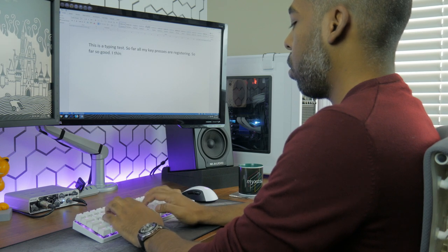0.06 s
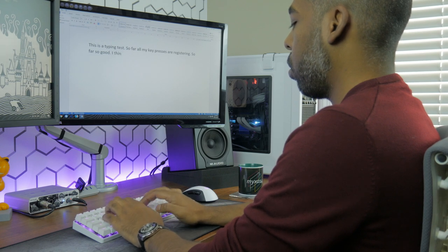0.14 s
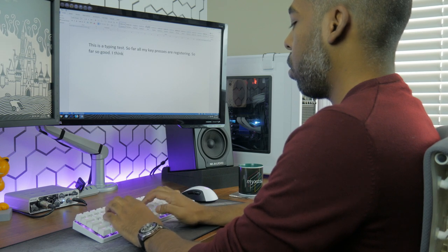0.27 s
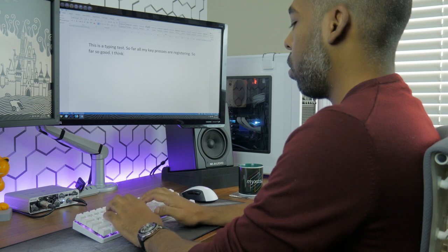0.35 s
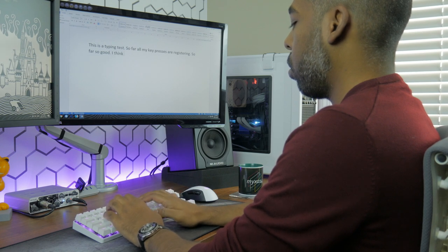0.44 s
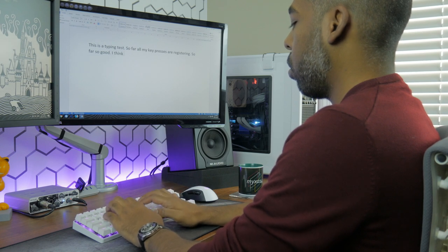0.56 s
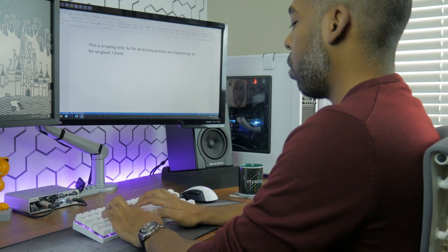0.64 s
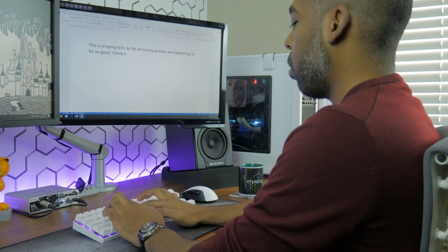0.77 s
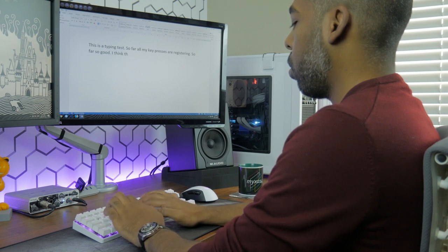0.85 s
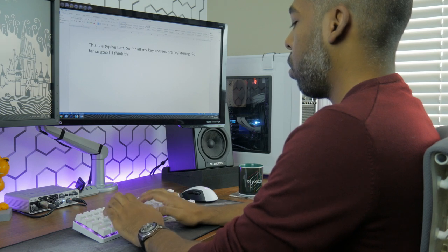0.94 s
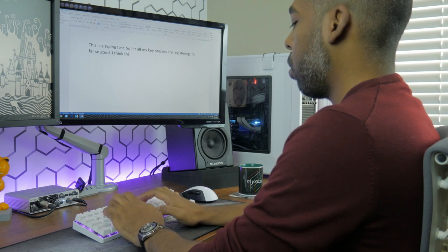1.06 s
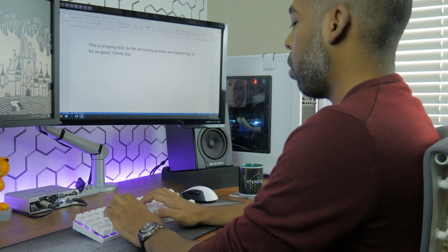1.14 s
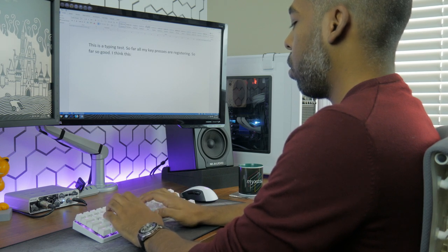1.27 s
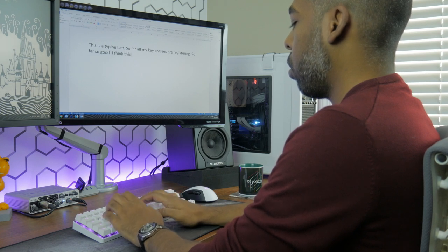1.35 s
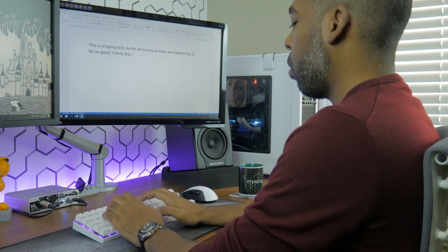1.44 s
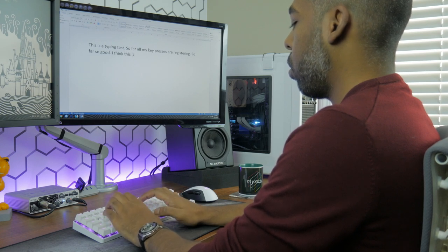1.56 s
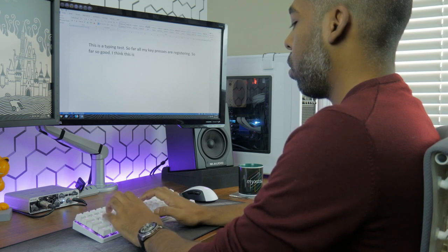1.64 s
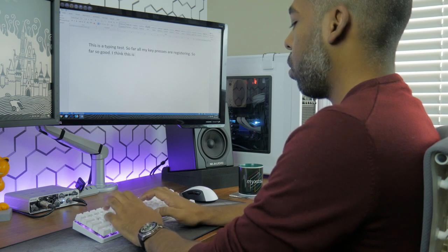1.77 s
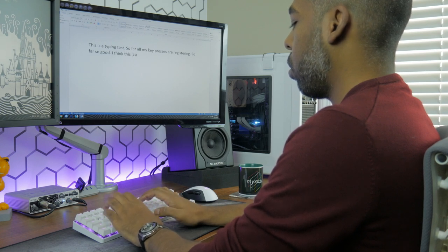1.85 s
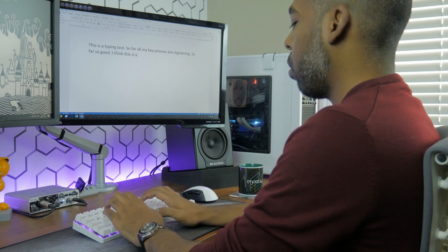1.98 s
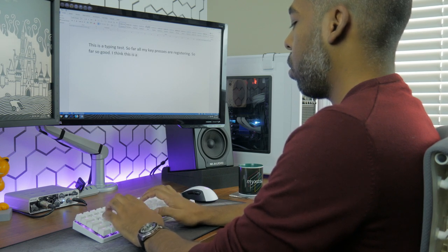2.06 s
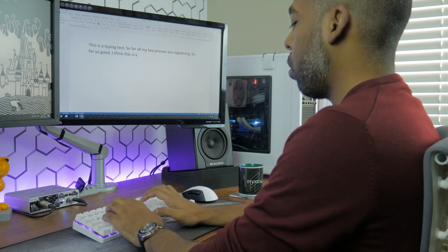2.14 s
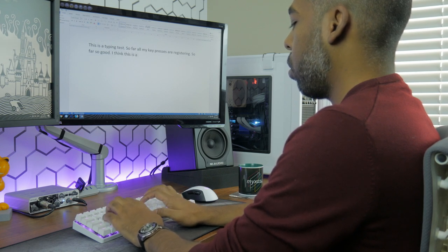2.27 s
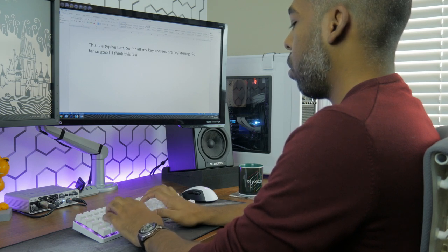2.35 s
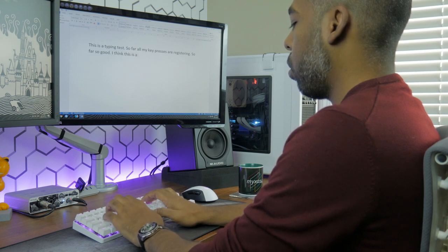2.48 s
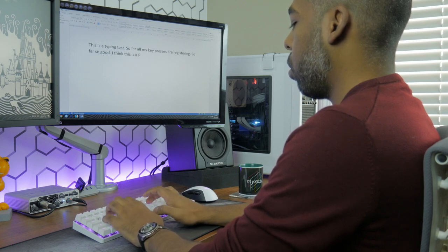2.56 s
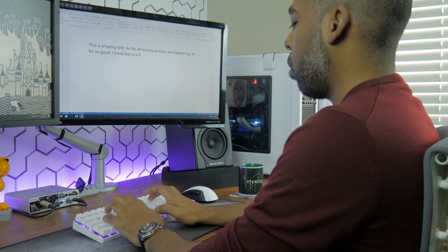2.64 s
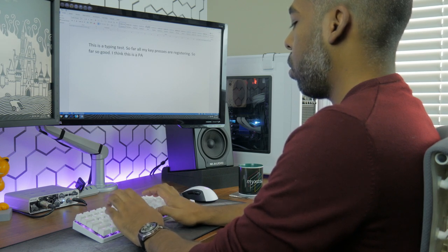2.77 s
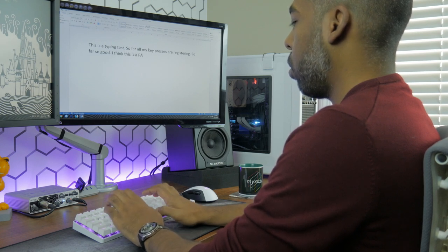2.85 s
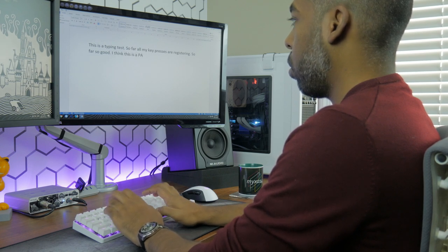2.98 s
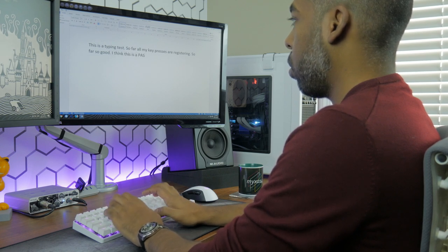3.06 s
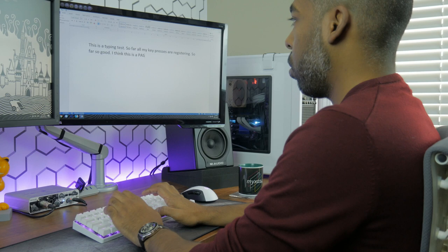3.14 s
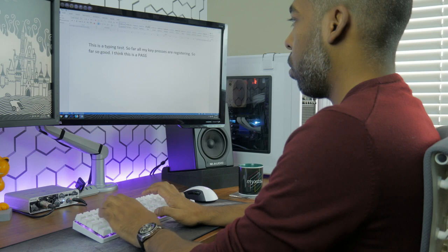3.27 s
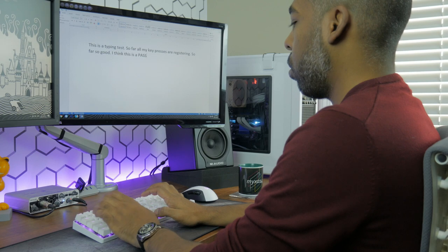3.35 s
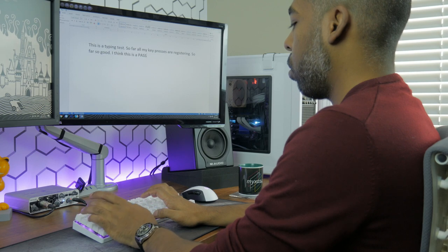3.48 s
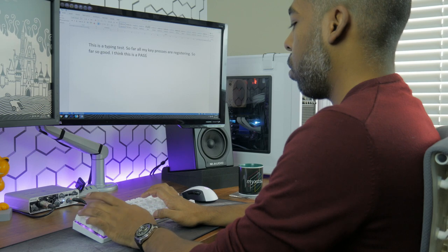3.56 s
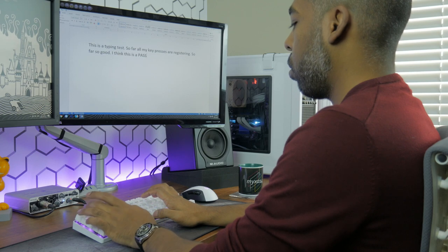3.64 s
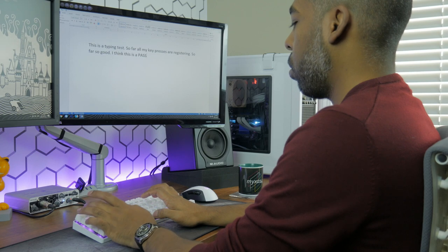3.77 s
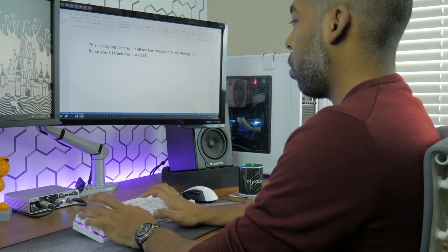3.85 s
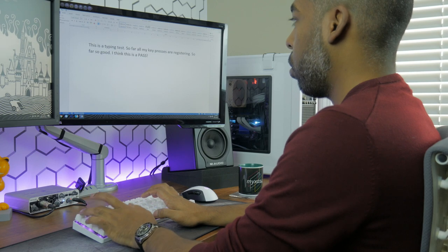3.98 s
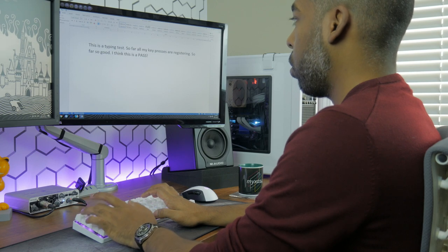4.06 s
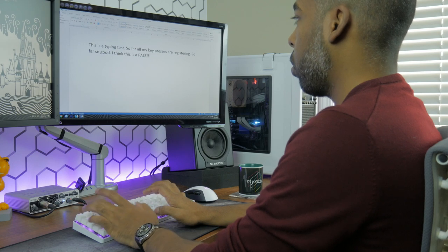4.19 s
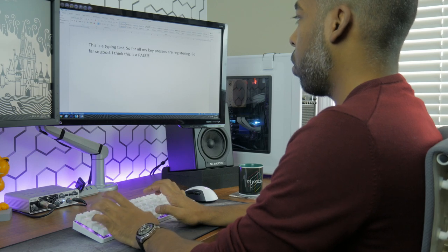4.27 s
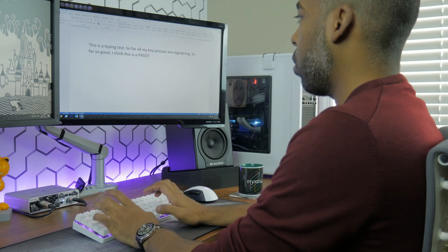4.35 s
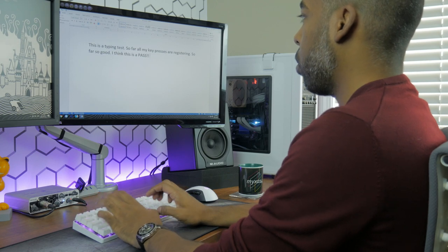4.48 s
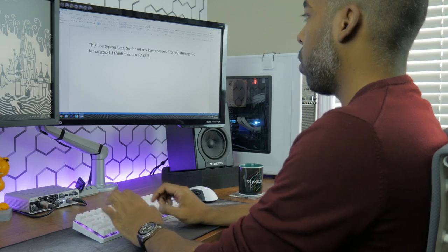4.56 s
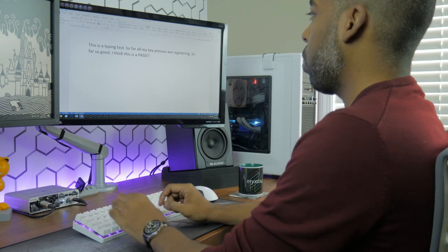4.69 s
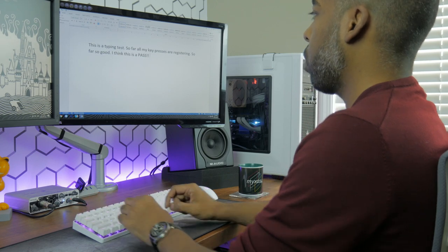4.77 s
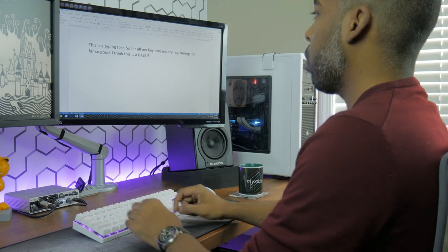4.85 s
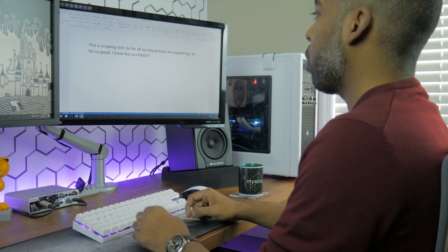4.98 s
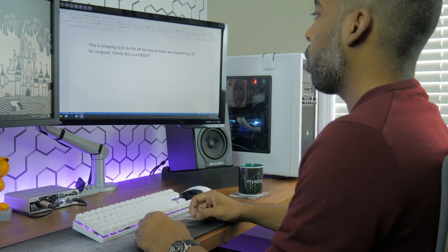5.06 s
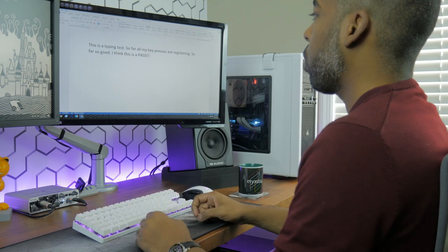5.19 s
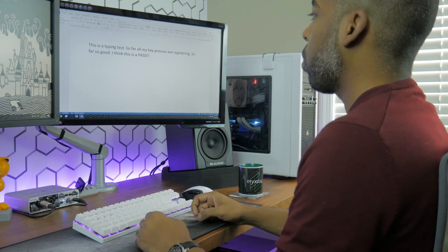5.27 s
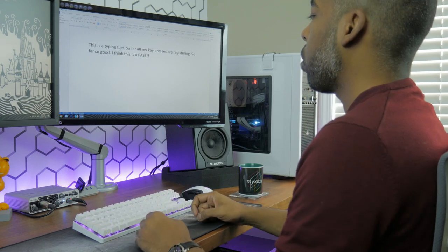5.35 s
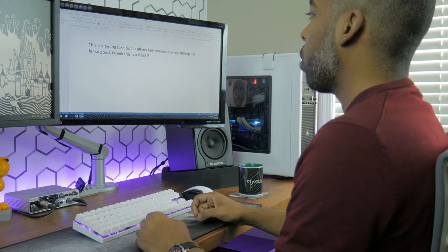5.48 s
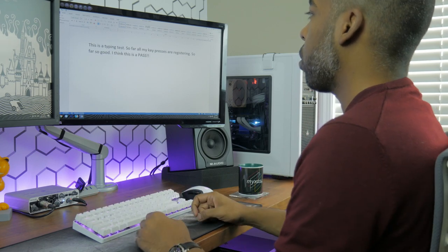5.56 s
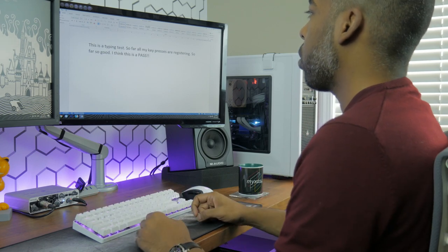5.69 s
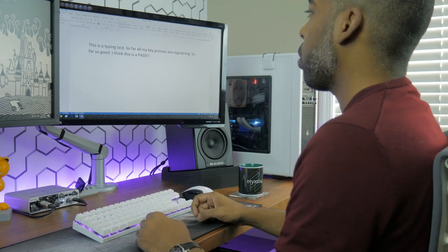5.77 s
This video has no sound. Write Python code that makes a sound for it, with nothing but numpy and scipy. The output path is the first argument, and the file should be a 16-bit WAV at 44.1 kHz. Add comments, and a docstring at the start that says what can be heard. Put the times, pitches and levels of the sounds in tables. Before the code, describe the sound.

Fast, sharp typing on a clicky mechanical keyboard in short bursts, close up in a quiet room, ending with a hand knocking the desk.

```python
"""A key knock opens quick bursts of typing on a mechanical keyboard in a small quiet room, nearly mono and close.
Fingertips land, then stems scrape, knock and rattle: noisy blows excite the rings of cap and case.
Near the end a hand drops on the desk, as a ringing click, and sleeves brush back in hissing noise.
Below lie a wavering sine hum that drifts up overall and a steady noise room tone; sparse taps make the room's answer."""
import sys
import numpy as np
from scipy import signal
from scipy.fft import rfft, irfft
from scipy.io import wavfile
from scipy.ndimage import uniform_filter1d

SR = 44100
rng = np.random.default_rng(int(sys.argv[2]) if len(sys.argv) > 2 else 0)


def waveform_to_disk(signal):
    """Save audio, clipped to [-1, 1], as 16-bit WAV at the path in sys.argv[1]."""
    frames = np.transpose(np.atleast_2d(signal))
    scaled = np.clip(frames, -1, 1) * 32767
    samples = np.round(scaled).astype(np.int16)
    wavfile.write(sys.argv[1], SR, samples)


N = 256662

# room tone spectrum: (f/Hz, relative level/dB)
ROOM_TONE = [(12, -49), (20, -14.5), (80, -18), (112, -8), (161, -10), (202, -6.5), (343, -10), (372, -9.5),
             (565, -13.5), (908, -20.5), (1100, -19), (3180, -32.5), (15600, -44.5)]
ROOM_TONE_DB = -58.5  # rms
# left-right likeness of the room tone: (f/Hz, correlation/0-1)
TONE_LIKENESS = [(60, 0.97), (240, 0.99), (950, 0.99), (3770, 0.72), (15000, 0.3)]
# hum glide, before its level wavers: (t/s, f/Hz, rms level/dB)
HUM_GLIDE = [(0, 105.9, -83), (1.9, 101.4, -80), (2.4, 107, -68.5), (3.001, 112, -59), (3.5, 116, -65),
             (4.0, 121, -77), (4.601, 122.4, -69.5), (5.82, 130, -82.5)]
# cloth sliding: (start t/s, end t/s, level/dB)
SLEEVE_BRUSHES = [(4.56, 4.83, -59.5), (4.959, 5.23, -60.5)]
# cloth hiss spectrum: (f/Hz, relative level/dB)
CLOTH_SPECTRUM = [(1470, -32.5), (2500, -11.5), (3910, -9), (4050, -7), (4390, -5), (4750, -10),
                  (7920, -6.5), (10000, -21), (14000, -29)]
# decay of the room: (f/Hz, t60/s)
ROOM_DECAY = [(300, 0.17), (800, 0.28), (2000, 0.26), (5500, 0.25), (12000, 0.18)]
# side under mid in the room's answer: (f/Hz, level/dB)
ROOM_WIDTH = [(500, -22.5), (1200, -31), (2500, -27.5), (5000, -20), (12000, -16)]
# knuckles on the desk: (t/s, level/dB)
KNUCKLES = [(4.525, 1), (4.531, -6.5), (4.538, -7), (4.542, -8)]
# desk spectrum: (f/Hz, relative level/dB)
DESK_SPECTRUM = [(47, -71.5), (80, -56), (279, -10), (482, -2.5), (1130, 7), (1610, -5.5), (1790, -3.5),
                 (2140, 1), (6110, -16), (15000, -88)]
# desk resonances: (f/Hz, width/Hz, lift/dB)
DESK_RINGS = [(450, 88, 6.5), (524, 53, 9), (709, 36, 7.5), (1128, 71, -1), (1460, 130, 6.5),
              (1787, 160, 8.5)]
# plastic case and plate: (f/Hz, relative level/dB)
CASE_SPECTRUM = [(120, -45.5), (200, -43), (516, -25), (653, -7), (770, -2), (1030, -4.5), (1330, 0),
                 (1780, -1), (2340, -1), (3430, -2.5), (5030, -15), (9680, -21), (10500, -27.5),
                 (14000, -32), (15600, -38.5)]
# narrow case resonances, before they are limited: (f/Hz, width/Hz, lift/dB)
CASE_RINGS = [(705, 60, -1.5), (1390, 93, 4.5), (1493, 18, 10.5), (2320, 140, 4), (2540, 72, 2.5),
              (3100, 26, 6), (3290, 41, 4), (5980, 150, 1), (8530, 2700, 5)]
# fingertips landing on a cap just before its knock: (t/s, level/dB)
FINGERTIPS = [(0.256, -4), (0.678, -12.5), (0.767, -22), (0.867, -18), (0.968, -14), (1.106, -17.5),
              (1.181, -6.5), (1.354, -20), (1.57, -2.5), (1.677, -12.5), (2.301, -34), (2.343, -23),
              (2.596, -24), (2.934, -16.5), (2.994, -10.5), (3.05, -18), (3.21, -14.5), (3.472, -43),
              (3.868, -14), (4.208, -12.5), (4.308, -22)]
# a loose key whose wire rattles and rings high: (t/s, level/dB, case thud level/dB)
LOOSE_KNOCKS = [(2.358, -12.5, 3.5), (3.221, -6, 7), (3.493, -7, -17), (4.21, -4.5, 5)]
# resonances of that wire: (f/Hz, width/Hz, lift/dB)
WIRE_RINGS = [(5810, 730, 10.3), (4310, 250, 4)]
# wide keys knocking, down or up: (t/s, level/dB, cap ring f/Hz, case thud level/dB)
WIDE_KNOCKS = [(0.266, 5, 2370, 9.5), (0.362, -5.5, 1940, 7.5), (1.189, 5, 2210, 8), (1.259, -7, 2070, 4.5),
               (1.58, 4.5, 2220, 5.5), (1.685, -4.5, 1950, 11.5), (1.875, 1.3, 2290, 8),
               (1.972, -2, 2000, 10), (4.32, 3, 2250, 7), (4.441, -1, 1900, 14)]
# letter keys knocking, down or up: (t/s, level/dB, cap ring f/Hz, treble level/dB)
LETTER_KNOCKS = [(0.002, -12, 1460, 11), (0.076, -7.5, 2670, 4.5), (0.12, -9, 1400, 1),
                 (0.195, -10, 2490, 6), (0.691, -3, 2440, 7), (0.774, -5, 2720, 5.5),
                 (0.788, -10.5, 1700, -20), (0.873, -0.5, 2300, 5), (0.91, -4, 1520, 3),
                 (0.979, -9, 1480, 4), (1.011, -1.5, 2560, 10.5), (1.119, -14.5, 3100, -17),
                 (1.367, -5.5, 1490, -4), (1.431, -7.5, 2130, 11), (1.449, -9, 1430, -13),
                 (1.533, -11, 1150, 4), (1.541, -13.5, 2960, -13), (1.724, -11, 1540, 3.5),
                 (1.818, -9, 2040, 4.5), (1.863, -5, 1360, 4.5), (1.943, -19, 1370, 9.5),
                 (2.173, -25.5, 1560, -17), (2.31, -27, 3380, 4), (2.479, -14.5, 3100, 6.5),
                 (2.501, -10.5, 1520, 1), (2.606, -10.5, 1700, 4.5), (2.669, -7.5, 1410, 2.5),
                 (2.709, -10, 2050, 2), (2.942, -3, 1970, 12), (3.0, -6.5, 1200, -2.2),
                 (3.066, -9, 2820, 8.5), (3.127, -8, 3020, 5), (3.434, -23, 1540, 6),
                 (3.487, -1.5, 1490, 8), (3.597, -32, 1336, -20), (3.877, -3.5, 2580, 4.5),
                 (3.962, -9.5, 2145, -1), (4.021, -14, 2020, -6.5), (4.111, -10, 2130, 3),
                 (4.184, -19, 2460, 16), (4.567, -19.5, 1200, 17)]

HZ = np.fft.rfftfreq(4096, 1 / SR)
EDGE_HZ = 15700  # upper band limit
LEAD = 440  # samples of stem travel before each knock
# room against direct sound
LETTER_WET_DB, WIDE_WET_DB, LOOSE_WET_DB, TOUCH_WET_DB, DESK_WET_DB = 3.5, 3, 3.5, -1, 2
TOUCH_HZ, TOUCH_TREBLE_DB, TOUCH_THUD_DB, TOUCH_RATTLE_DB = 1580, 8, -2, 12.5
LOOSE_HZ, LOOSE_TREBLE_DB, LOOSE_RATTLE_DB = 1500, 11.5, 7
WIDE_TREBLE_DB, WIDE_RATTLE_DB = 8.5, -9.5
# letter keys: hard strokes shake the case more, soft ones are more rattly
THUD_DB, THUD_PER_DB, RATTLE_DB, RATTLE_PER_DB = -5.5, 0.4, -14, -0.84
# every knock lifts or damps a few rings of its own
OWN_LOW_HZ, OWN_HIGH_HZ, OWN_WIDTH_HZ, OWN_DB = 1087, 5917, 270, 5
# rings that meet do not pile up; harder strokes bring them out slightly more
RING_MAX_DB, RING_GROWTH = 8.5, 0.03
CRACK_S, CRACK_SHARE = 0.0023, 0.51  # this share of the direct ring dies with this time constant


def gain_of(db):
    """Turns dB into an amplitude factor."""
    return 10 ** (np.asarray(db) / 20)


def evened(x):
    """Scales a signal to rms 1."""
    return x / np.sqrt(np.mean(x ** 2) + 1e-20)


def unit_energy(x):
    """Scales a signal to energy 1."""
    return x / np.linalg.norm(x)


def read(points, hz):
    """Reads a spectrum on a log-frequency axis."""
    f, value = np.transpose(points)
    return np.interp(np.log(hz + 1), np.log(f + 1), value)


def add(mix, s, sound):
    """Mixes a sound in at time s."""
    part = mix[..., round(s * SR):][..., :sound.shape[-1]]
    part += sound[..., :part.shape[-1]]


def lifts(modes):
    """Draws resonances as bumps in dB."""
    return sum(db / (1 + (2 * (HZ - f) / width) ** 2) for f, width, db in modes)


def ring(colour_db):
    """Makes a minimum-phase click of this colour, so its energy comes early; peak 1."""
    cepstrum = irfft(np.log(gain_of(np.maximum(colour_db, -100))))
    # fold the cepstrum onto its causal half
    cepstrum[1:2048] *= 2
    cepstrum[2049:] = 0
    click = irfft(np.exp(rfft(cepstrum)))[:3000]
    return click / abs(click).max()


def noise(spectrum, likeness, patchy_db):
    """Makes two-channel noise of rms 1 from random short-time spectra with drifting patches."""
    frames = N // 256 + 5
    hz = np.fft.rfftfreq(1024, 1 / SR)
    a, b, c, d, grain = rng.standard_normal((frames, 513, 5)).T
    patches = uniform_filter1d(grain, size=8, axis=0)  # across frequency
    patches = evened(uniform_filter1d(patches, size=12, axis=1))  # across time
    same = np.clip(read(likeness, hz), -1, 1)[:, None]
    left = a + 1j * b
    right = same * left + np.sqrt(1 - same ** 2) * (c + 1j * d)
    shaped = np.array([left, right]) * gain_of(read(spectrum, hz)[:, None] + patchy_db * patches)
    return evened(signal.istft(shaped, nperseg=1024, noverlap=768)[1][:, :N])


def room_tone():
    """Steady coloured noise, much alike in both channels at low frequencies and wider on top."""
    return gain_of(ROOM_TONE_DB) * noise(ROOM_TONE, TONE_LIKENESS, patchy_db=0.5)


def hum():
    """A low sine of wavering level whose pitch dips, then drifts upward."""
    s, hz, db = np.transpose(HUM_GLIDE)
    t = np.arange(N) / SR
    slow = uniform_filter1d(rng.standard_normal(N), size=3000)
    waver_db = 2.2 * evened(uniform_filter1d(slow, size=3000))
    phase = 2 * np.pi * np.cumsum(np.interp(t, s, hz)) / SR
    return np.sqrt(2) * gain_of(np.interp(t, s, db) + waver_db) * np.sin(phase)


def sleeves():
    """Soft cloth friction as the arms draw back: patchy hiss that swells and fades."""
    level = np.zeros(N)
    for start, end, db in SLEEVE_BRUSHES:
        add(level, start, gain_of(db) * signal.windows.hann(round((end - start) * SR)))
    return level * noise(CLOTH_SPECTRUM, [(3000, 0.81), (10000, .9)], patchy_db=3)


def room(near, far, wet_db):
    """Direct sound plus a fresh tail of sparse taps, since every knock sits at another spot."""
    taps = np.zeros((2, 16000))
    at = np.arange(40, 15980, 12) + rng.integers(0, 12, (2, 1329))
    np.put_along_axis(taps, at, rng.choice([-1., 1.], at.shape), 1)
    age = np.arange(16000) / SR
    # desk and screen answer at once, the walls build up
    taps *= 1 - np.exp(-age / 0.0091) + 2.64 * np.exp(-age / 0.0036)
    hz, t, z = signal.stft(taps, SR, nperseg=256)
    z = z * gain_of(-60 * t / read(ROOM_DECAY, hz)[:, None])
    z[1] *= gain_of(read(ROOM_WIDTH, hz))[:, None]
    mid, side = signal.istft(z, SR, nperseg=256)[1]
    tail = gain_of(wet_db) * np.array([mid + side, mid - side]) / np.linalg.norm(mid)
    out = signal.fftconvolve(far[None], tail, axes=1)
    balance_db = .3 * rng.standard_normal() * np.array([[1], [-1]])  # a little left or right
    add(out, 0, near * gain_of(balance_db))
    return out


def hand_drop():
    """Knuckles strike the desk in quick succession and its panel rings."""
    out = np.zeros((2, N))
    desk = ring(read(DESK_SPECTRUM, HZ) + lifts(DESK_RINGS))
    desk = desk * np.minimum(np.arange(len(desk)) / SR / 0.0007, 1)  # soft flesh slows the attack
    for s, db in KNUCKLES:
        knock = gain_of(db) * desk
        add(out, s, room(knock, knock, DESK_WET_DB))
    return out


def key_blow(rattle_db):
    """The stem scrapes down, knocks in a few tiny contacts, then rattles."""
    t = (np.arange(2000) - LEAD) / SR
    after = np.maximum(t, 0)
    contacts, grit = rng.standard_normal((2, len(t)))
    chance = rng.random(len(t))
    # bright grit around the knock
    knock = 0.15 * np.gradient(contacts * (after / 0.00066) * np.exp(-after / 0.00079))
    knock[LEAD + 20:LEAD + 28] += signal.windows.hann(8) / 3.5  # main contact, a fraction of a millisecond
    scrape = grit * (t < 0) * np.exp(t / 0.019)
    rattle = grit ** 2 * np.sign(grit) * (chance > .9) * after * np.exp(-after / 0.0021)
    blow = unit_energy(knock) + gain_of(rattle_db) * unit_energy(rattle)
    return blow + gain_of(-12.5) * unit_energy(scrape)


def key(db, cap_hz, treble_db, thud_db, rattle_db, wire=()):
    """A blow rings cap and case; returns the sound toward the microphone and into the room."""
    blow = key_blow(rattle_db)
    treble = treble_db / (1 + (4500 / (HZ + 1)) ** 4)  # high shelf
    thud = thud_db / (1 + (HZ / 880) ** 6)  # low shelf of the shaken case
    body_db = read(CASE_SPECTRUM, HZ) + lifts(wire) + treble + thud
    low, high = np.log([OWN_LOW_HZ, OWN_HIGH_HZ])
    own = [(np.exp(low + (high - low) * u), OWN_WIDTH_HZ, OWN_DB * (2 * v - .7))
           for u, v in rng.random(size=(8, 2))]
    rings_db = RING_MAX_DB * np.tanh((lifts(CASE_RINGS) + lifts(own)) / RING_MAX_DB)
    body_db += gain_of(RING_GROWTH * db) * rings_db
    click = ring(body_db + lifts([(cap_hz, 500, 11)]))  # the cap ring beams upward
    crack = np.exp(-np.arange(len(click)) / SR / CRACK_S)
    near = signal.fftconvolve(blow, click * (1 - CRACK_SHARE + CRACK_SHARE * crack))
    far = signal.fftconvolve(blow, ring(body_db + lifts([(cap_hz, 600, 4)])))
    # level set by the direct knock's energy
    return gain_of(db) * np.sqrt(0.00024 * SR) / np.linalg.norm(near) * np.array([near, far])


def fingertips():
    """Fingertips meet the caps: light, very rattly blows through the same cap and case."""
    return [(s, TOUCH_WET_DB, key(db, TOUCH_HZ, TOUCH_TREBLE_DB, TOUCH_THUD_DB, TOUCH_RATTLE_DB))
            for s, db in FINGERTIPS]


def loose_key():
    """A loose key's wire adds strong rattle and high resonances to its knocks."""
    return [(s, LOOSE_WET_DB, key(db, LOOSE_HZ, LOOSE_TREBLE_DB, thud_db, LOOSE_RATTLE_DB, WIRE_RINGS))
            for s, db, thud_db in LOOSE_KNOCKS]


def wide_keys():
    """Wide keys shake the case more, so their knocks carry a heavier thud."""
    return [(s, WIDE_WET_DB, key(db, hz, WIDE_TREBLE_DB, thud_db, WIDE_RATTLE_DB))
            for s, db, hz, thud_db in WIDE_KNOCKS]


def letter_keys():
    """Letter keys trade rattle for case thud as the stroke gets harder."""
    knocks = []
    for s, db, hz, treble_db in LETTER_KNOCKS:
        thud_db = THUD_DB + THUD_PER_DB * db
        rattle_db = RATTLE_DB + RATTLE_PER_DB * db
        knocks.append((s, LETTER_WET_DB, key(db, hz, treble_db, thud_db, rattle_db)))
    return knocks


def typing():
    """All touches and key knocks, each with its own room answer."""
    out = np.zeros((2, N + LEAD))
    for s, wet_db, (near, far) in fingertips() + loose_key() + wide_keys() + letter_keys():
        add(out, s, room(near, far, wet_db))
    return out[:, LEAD:]  # knocks, not scrapes, fall on the listed times


def scene():
    """Room tone, hum, sleeves and hand under the typing."""
    return room_tone() + hum() + sleeves() + hand_drop() + typing()


def record(dry):
    """Clips whatever exceeds full scale, then limits the band."""
    clipped = np.clip(dry, -1, 1)
    lowpass = signal.firwin(511, EDGE_HZ, window=("kaiser", 9), fs=SR)
    return signal.oaconvolve(clipped, lowpass[None], "same")


dry = scene()
out = record(dry)
waveform_to_disk(out)
```